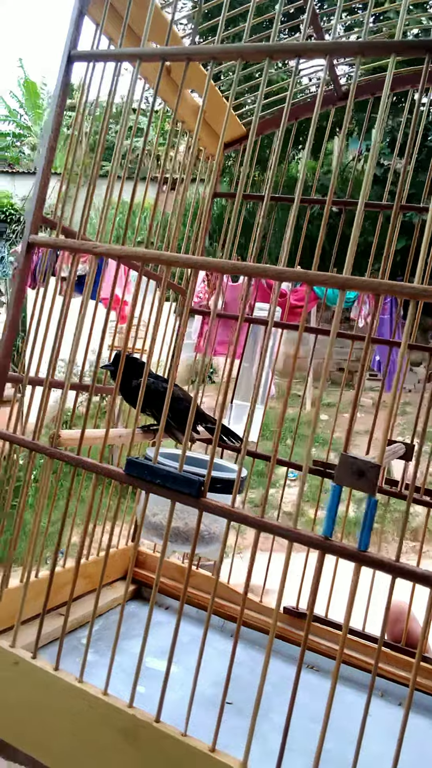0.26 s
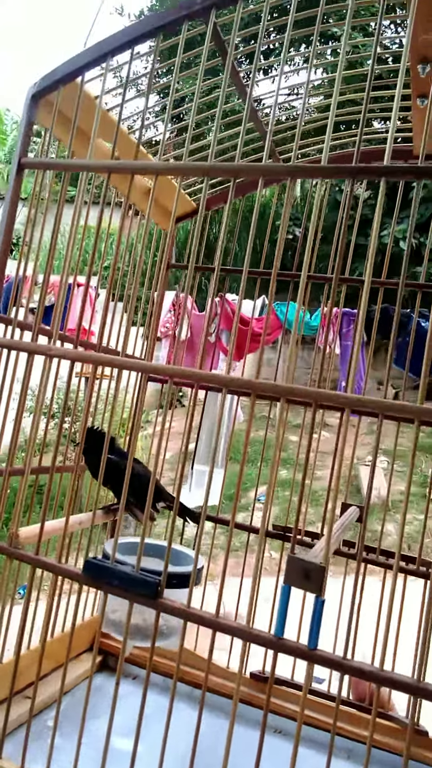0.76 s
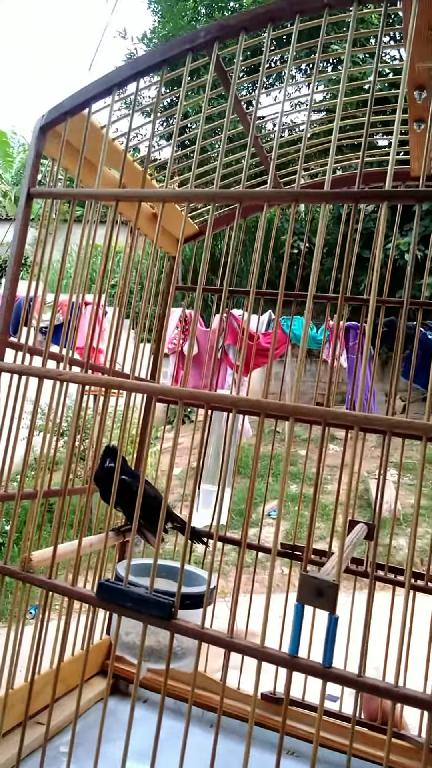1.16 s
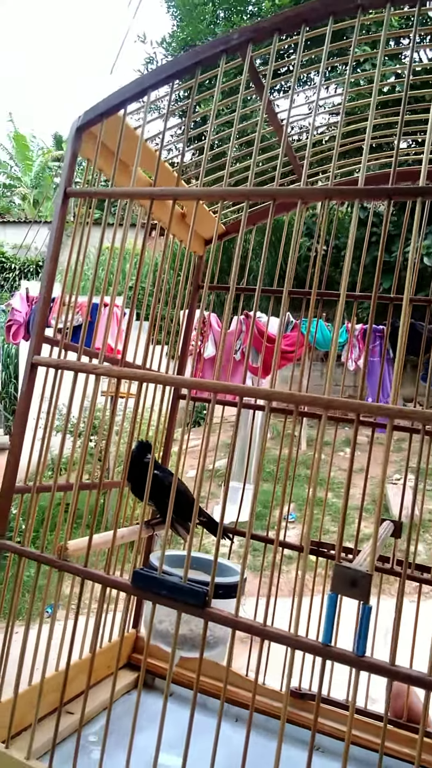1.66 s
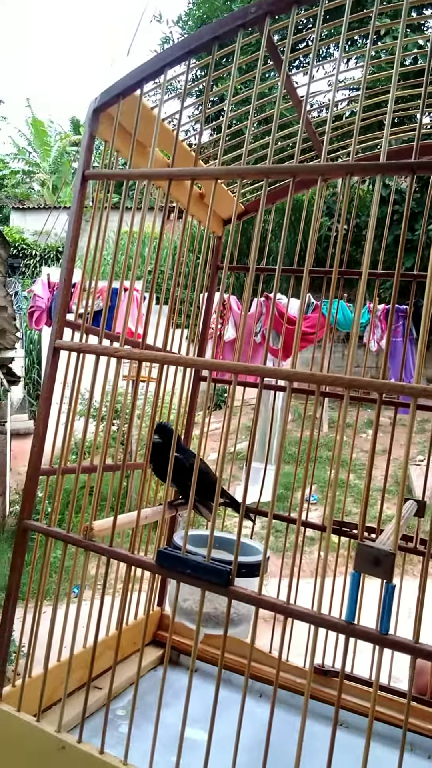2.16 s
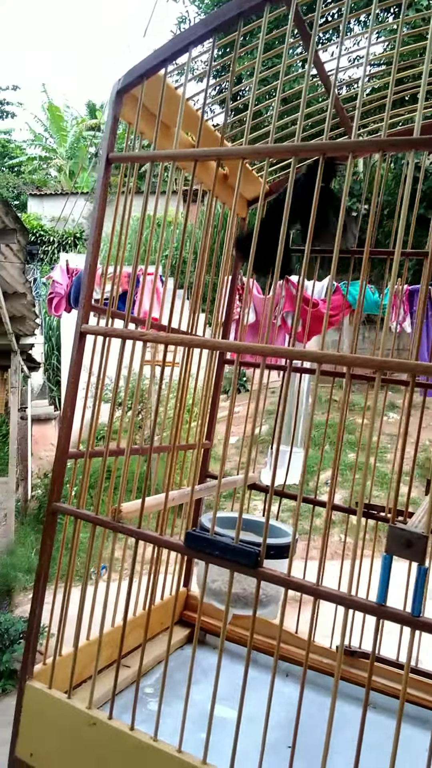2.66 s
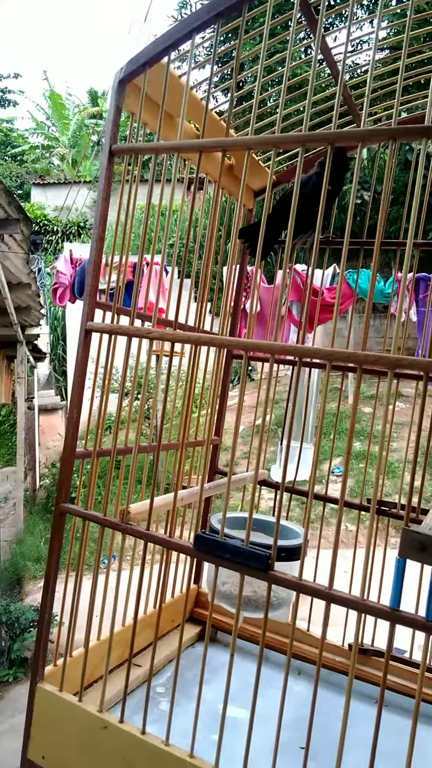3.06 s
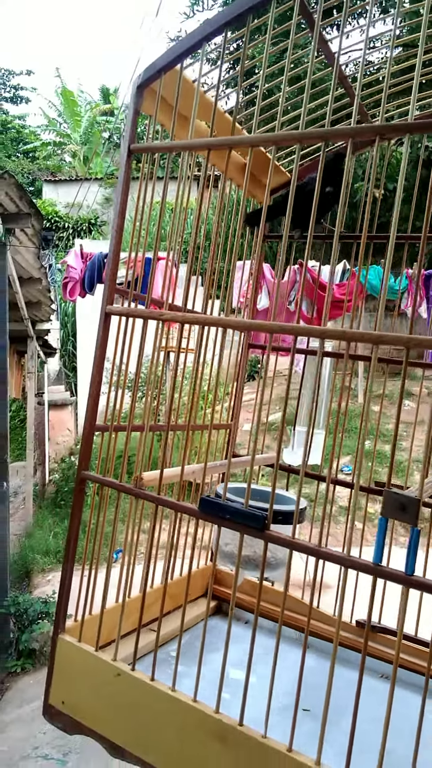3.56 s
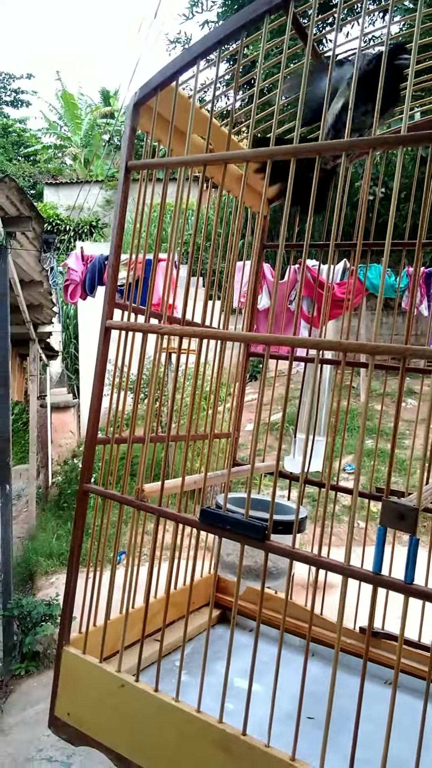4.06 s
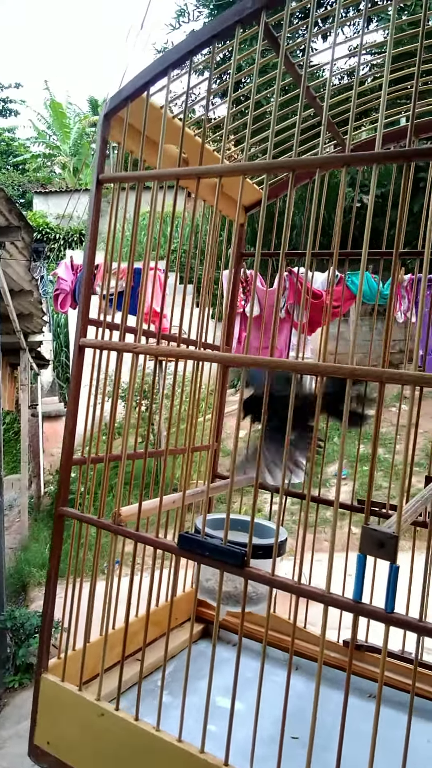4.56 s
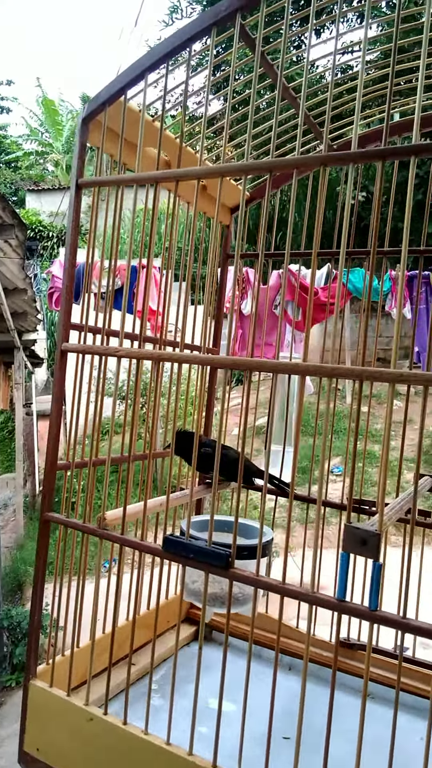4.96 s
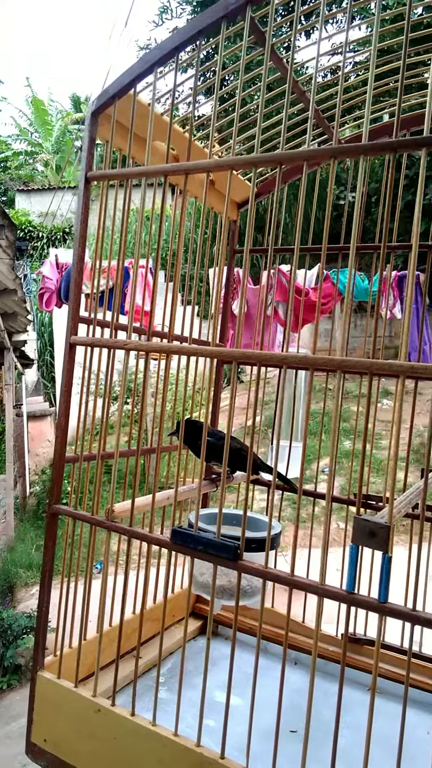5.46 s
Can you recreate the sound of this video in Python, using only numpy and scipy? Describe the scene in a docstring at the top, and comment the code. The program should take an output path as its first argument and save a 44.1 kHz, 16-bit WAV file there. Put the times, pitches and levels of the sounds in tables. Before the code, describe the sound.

A microphone clicks open with a dull pop in a walled yard. A far bird buzzes, a hollow double knock sounds, and another distant songbird runs down slurred whistles and chirps. A caged bird close by gives tiny sharp chips with soft thumps, rattles the cage lightly, then delivers a piercing stutter, buzz and short whistle. Low rumble and airy rush grow toward the end.

```python
"""Caged grassquit in a walled yard

A caged grassquit gives thin chips and one loud song: a stutter, a buzz and a short whistle. Its chips are
rapid sweeps, its buzz a train of short falling sweeps. Farther off another grassquit sings the same song, a
third songbird runs down slurred whistles built from gliding tones, and something knocks, a burst in resonances.
The phone's microphone switches on with a pop, has a narrow band and turns the shrillest notes into dull thumps."""
import sys
import numpy as np
from scipy import signal
from scipy.fft import rfft, irfft
from scipy.io import wavfile
from scipy.ndimage import uniform_filter1d, map_coordinates

SR = 44100
rng = np.random.default_rng(int(sys.argv[2]) if len(sys.argv) > 2 else 0)


def wrap_up_sound(samples):
    """Save the sound to the file named by the first command line argument, as 16-bit audio."""
    columns = np.atleast_2d(samples).T
    # keep every value between -1 and 1, then stretch to whole-number steps
    tamed = np.clip(columns, -1, 1)
    steps = np.round(tamed * 32767).astype(np.int16)
    wavfile.write(sys.argv[1], SR, steps)


N = 252252
TIME = np.arange(N) / SR


def from_db(db):
    """Logarithmic level: decibels become an amplitude ratio."""
    return 10 ** (np.asarray(db) / 20)


def rms_one(x):
    """Normalisation: scale to unit root-mean-square."""
    return x / np.sqrt(np.mean(x ** 2) + 1e-20)


def add(out, start_s, sound):
    """Superposition: mix a sound in at a time."""
    at = max(round(start_s * SR), 0)
    out[at:at + len(sound)] += sound[:N - at]


def cut(x, hz, kind, order=2):
    """Butterworth filtering: a maximally flat passband."""
    sections = signal.butter(order, min(hz, SR * .45), kind, fs=SR, output="sos")
    return signal.sosfilt(sections, x + 1e-18)


def drift(rate_hz):
    """Low-passed noise: a smooth random course of unit rms."""
    noise = rng.standard_normal(N + SR)
    return rms_one(cut(noise, rate_hz, "low", order=4)[SR:])   # the filter's onset is dropped


def coloured(spectrum):
    """Spectral shaping: noise of unit rms, its density drawn on a logarithmic frequency axis."""
    hz, db = np.transpose(spectrum)
    log_bins = np.log(np.fft.rfftfreq(N, 1 / SR) + 1)
    gain = from_db(np.interp(log_bins, np.log(hz), db, left=-90, right=-90))
    return rms_one(irfft(rfft(rng.standard_normal(N)) * gain, N))


def resonance(x, hz, width_hz):
    """Two-pole resonance: a damped mode with a gain close to 1 at its peak."""
    radius = np.exp(-np.pi * width_hz / SR)
    zeros = np.array([1, 0, -1]) * (1 - radius ** 2) / 2
    poles = [1, -2 * radius * np.cos(2 * np.pi * hz / SR), radius ** 2]
    return signal.lfilter(zeros, poles, x)


def phase_of(hz):
    """Frequency modulation: phase is the running integral of frequency."""
    return 2 * np.pi * np.cumsum(hz) / SR


def envelope(t, attack_s, release_s):
    """Amplitude envelope: a squared-sine rise, a hold and a squared-sine fall."""
    edge = np.minimum((t - t[0]) / attack_s, (t[-1] - t) / release_s)
    return np.sin(np.pi / 2 * np.clip(edge, 0, 1)) ** 2


def echo(x, delay_s, db):
    """Specular reflection: one delayed copy, whose delay may move."""
    return from_db(db) * map_coordinates(x, [(TIME - delay_s) * SR], order=3)


def yard(x, t60, build_s, early_db):
    """Diffuse reverberation: walls and leaves scatter a cluster of early returns, then a dying wash."""
    t = TIME[:SR]
    decay = from_db(-60 * t / t60) + from_db(early_db) * np.exp(-t / 0.048)
    response = rng.standard_normal(SR) * (1 - np.exp(-t / build_s)) * decay
    return signal.fftconvolve(x, response / np.linalg.norm(response))[:N]


# Yard air over time. Each row: time in seconds, relative rumble level in dB, relative hiss level in dB.
AIR_COURSE = [(0.18, -63, -68.7), (0.42, -61, -66), (0.48, -52.5, -64), (0.84, -67, -75),
              (1.14, -57.5, -63), (1.26, -63.5, -70.5), (1.5, -59, -64), (1.56, -61.5, -70),
              (1.86, -55, -61.5), (1.92, -58, -65.4), (2.88, -53, -61), (3.12, -61.3, -68.5),
              (3.24, -55.5, -63.0), (3.9, -51.5, -61.5), (3.96, -47.5, -57), (4.26, -42.5, -51),
              (4.38, -46, -55), (4.92, -44, -53), (4.98, -43, -53.5), (5.1, -44.5, -56), (5.22, -40, -49.5),
              (5.7, -41, -51)]
# Spectrum of the low rumble. Each row: frequency in Hz, relative density in dB per Hz.
RUMBLE_SPECTRUM = [(15, -46.5), (25, -30.5), (48, -1), (81, 0.5), (151, -5), (306, -11.5), (400, -19.5),
                   (520, -32.5), (880, -120)]
# Spectrum of the soft rushing. Each row: frequency in Hz, relative density in dB per Hz.
HISS_SPECTRUM = [(150, -27), (250, -4.5), (432, -3.5), (606, -5.5), (734, -7.5), (1340, -13), (2690, -20.5),
                 (6140, -34.5), (7550, -36), (8500, -66.5), (11000, -90), (18700, -120)]


def air(flutter_db=2.3, crackle_db=2.5, calm_share=0.25, lump_db=1.0):
    """Amplitude-modulated noise: rumble and a rushing that flutters and crackles more as it grows."""
    time_s, rumble_course, hiss_course = np.transpose(AIR_COURSE)
    rumble_db = np.interp(TIME, time_s, rumble_course) + 2
    hiss_db = np.interp(TIME, time_s, hiss_course) + 3.5
    unrest = np.interp(hiss_db, [-61, -53], [calm_share, 1])
    flutter = unrest * (flutter_db * drift(45) + crackle_db * drift(220))
    rumble = from_db(rumble_db + lump_db * drift(27) + .4 * flutter) * coloured(RUMBLE_SPECTRUM)
    return rumble + from_db(hiss_db + flutter) * coloured(HISS_SPECTRUM)


# A knock across the yard, struck twice. Each row: start in seconds, relative level in dB.
KNOCK_BLOWS = [(1.043, -44.5), (1.076, -42.5)]
# Modes of the knocked body. Each row: frequency in Hz, bandwidth in Hz, relative level in dB.
BODY_MODES = [(765, 41, 10.5), (882, 49, 9.5), (960, 17, -11.5), (1650, 310, -18), (2200, 170, -9),
              (2520, 100, -19), (3120, 400, -40)]


def knock(t60=0.14, tail_db=-7, tail_t60=0.5, crack_db=-22):
    """Modal resonance: decaying noise excites a hollow body, with a dying return from the walls."""
    blow, t = np.zeros(N), TIME[:SR]
    decay = from_db(-60 * t / t60) + from_db(tail_db - 60 * t / tail_t60)
    for start_s, db in KNOCK_BLOWS:
        add(blow, start_s, from_db(db) * decay * rng.standard_normal(SR))
    body = sum(from_db(db) * resonance(blow, hz, width_hz) for hz, width_hz, db in BODY_MODES)
    return from_db(11.5) * (body + from_db(crack_db) * cut(blow, 4000, "low"))


# Claws and wing tips touch the cage. Each row: start in seconds, relative level in dB.
CAGE_TAPS = [(2.616, -45), (4.003, -58), (4.037, -50), (4.464, -46), (4.498, -38.5), (4.537, -46.5),
             (4.589, -34), (5.101, -54.5), (5.637, -53.5), (5.674, -63)]


def taps(decay_s=0.0027):
    """Impulsive contact: short, dry, exponentially dying noise with its lows strengthened."""
    out, t = np.zeros(N), TIME[:SR // 20]
    for start_s, db in CAGE_TAPS:
        add(out, start_s, from_db(db) * np.exp(-t / decay_s) * rng.standard_normal(len(t)))
    return out + 3 * cut(out, 960, "low")


def arcs(rows, bow_per_s, attack_s, release_s, fade_db):
    """Gliding pitch: notes fade or grow, and bow more the longer they are; yields times, Hz and gain."""
    for start_s, length_s, first_hz, last_hz, db in rows:
        u = np.linspace(0, 1, round(length_s * SR))
        t = start_s + u * length_s
        bow = bow_per_s * length_s * np.sin(np.pi * u)
        hz = (first_hz + (last_hz - first_hz) * u) * (1 + bow)
        # a negative fade_db makes the note grow
        yield t, hz, from_db(db - fade_db * u) * envelope(t, attack_s, release_s)


def whistles(notes, waver, waver_hz, shimmer_db, partials=((1, 0),)):
    """Random modulation: pitch and level tremble; a wide, fast tremble is a rasp."""
    out = np.zeros(N)
    tremble, shimmer = 1 + waver * drift(waver_hz), shimmer_db * drift(160)
    for t, hz, gain in notes:
        phase = phase_of(hz * np.interp(t, TIME, tremble))
        tone = sum(from_db(level) * np.sin(round(k) * phase) for k, level in partials)
        level = gain * from_db(np.interp(t, TIME, shimmer))
        add(out, t[0], np.sqrt(2) * level * tone)
    return out


# Far songbird's short whistles and flicks. Each row: start in seconds, length in seconds, first pitch in Hz,
# last pitch in Hz, relative level in dB.
SHORT_WHISTLES = [(1.05, 0.074, 4520, 4657, -49.5), (1.375, 0.1, 5290, 4285, -48),
                  (1.592, 0.013, 6330, 8450, -50), (1.664, 0.045, 3730, 3840, -53.5),
                  (1.725, .055, 4710, 4790, -48.5), (1.888, 0.019, 6260, 8370, -51),
                  (2.005, 0.073, 5120, 5080, -45.5), (2.153, .016, 5600, 6700, -53),
                  (2.185, .02, 7600, 6800, -56.5), (2.2, 0.056, 4680, 4860, -48),
                  (2.403, 0.028, 4230, 4090, -44.5), (2.548, 0.068, 3703, 4100, -43.5),
                  (2.735, 0.044, 3533, 4024, -45.5)]
# Faint low whistles from farther away. Each row: start in seconds, length in seconds, first pitch in Hz,
# last pitch in Hz, relative level in dB.
FAINT_WHISTLES = [(2.16, .18, 1823, 1927, -70.5), (2.54, 0.28, 1930, 2003, -70),
                  (3.33, 0.23, 1960, 1922, -69), (3.55, 0.063, 2050, 2220, -67)]


def clear_whistles():
    """Nearly pure tones: a narrow random tremble leaves the whistles clear."""
    notes = [*arcs(SHORT_WHISTLES, bow_per_s=.25, attack_s=0.0039, release_s=0.0047, fade_db=5),
             *arcs(FAINT_WHISTLES, bow_per_s=0, attack_s=0.03, release_s=.04, fade_db=-1)]
    return whistles(notes, waver=0.012, waver_hz=190, shimmer_db=3.5)


# Far songbird's raspy chirps. Each row: start in seconds, length in seconds, first pitch in Hz,
# last pitch in Hz, relative level in dB.
RASPY_CHIRPS = [(1.69, .075, 2530, 2985, -63), (2.11, 0.06, 3950, 4390, -48.5),
                (2.295, 0.078, 3900, 3960, -49.5), (2.485, 0.061, 3600, 3670, -54),
                (2.67, 0.059, 3400, 3155, -53.5)]


def raspy_chirps():
    """Noise frequency modulation: a wide, fast tremble spreads each tone into a rasp."""
    notes = arcs(RASPY_CHIRPS, bow_per_s=-0.8, attack_s=.006, release_s=0.0042, fade_db=-0.5)
    return whistles(notes, waver=0.07, waver_hz=323, shimmer_db=-0.5)


# Far songbird's nasal calls. Each row: start in seconds, length in seconds, first pitch in Hz,
# last pitch in Hz, relative level in dB.
NASAL_NOTES = [(.945, .105, 2118, 2306, -56.5), (1.05, 0.036, 2392, 2404, -58),
               (1.662, 0.036, 1890, 1980, -55)]
# Their harmonics. Each row: multiple of the pitch, relative level in dB.
NASAL_HARMONICS = [(1, -13.5), (2, -9.5), (3, -4.5), (4, -14)]


def nasal_calls():
    """Harmonic series: second and third partials stronger than the fundamental give a nasal colour."""
    notes = arcs(NASAL_NOTES, bow_per_s=-1.4, attack_s=0.0046, release_s=0.0051, fade_db=-9)
    return whistles(notes, waver=0.036, waver_hz=330, shimmer_db=3, partials=NASAL_HARMONICS)


# Far songbird's falling slurs. Each row: start in seconds, length in seconds, top pitch in Hz,
# bottom pitch in Hz, time to fall half-way in seconds, relative level in dB.
FALLING_SLURS = [(1.292, .09, 7560, 4940, .052, -55.5), (1.581, 0.11, 7000, 4100, .05, -49.5),
                 (1.894, .115, 7770, 4550, .063, -44.5), (2.156, .055, 6420, 4530, .024, -44.5),
                 (2.358, .042, 5200, 4120, 0.0079, -46)]


def slurs(steepness=3.0, attack_share=0.82, release_s=0.0053):
    """Sigmoid glide: notes swell at a high pitch, fall fast and level out; yields times, Hz and gain."""
    for start_s, length_s, top_hz, bottom_hz, half_way_s, db in FALLING_SLURS:
        t = np.arange(0, length_s, 1 / SR)
        hz = bottom_hz + (top_hz - bottom_hz) / (1 + (t / half_way_s) ** steepness)
        yield start_s + t, hz, from_db(db) * envelope(t, attack_share * half_way_s, release_s)


def far_songbird():
    """Direct and reverberant field: the songbird is heard with one echo and the yard's wash."""
    song = clear_whistles() + whistles(slurs(), waver=0.022, waver_hz=260, shimmer_db=3.5)
    song = song + raspy_chirps() + nasal_calls()
    wash = from_db(-5) * yard(song, t60=0.66, build_s=0.0054, early_db=14.5)
    return from_db(-2.5) * song + echo(song, .019, -10.0) + wash


# Pitch of a buzz as it begins and the depth it sinks by; its pulse rate before it closes
BUZZ_HZ, BUZZ_SAG_HZ, PULSES_PER_S = 7628, 638, 204
# Over this time at its close it drops further and quickens
CLOSE_S, CLOSE_DROP_HZ, CLOSE_QUICKENS_PER_S = 0.031, 430, 46
ENDING_S, ENDING_HZ = 0.076, 5374   # the whistle that closes a grassquit song


def buzz_course(length_s, swell_db, swell_s, edge_s=0.0025, close_db=-10):
    """Slow modulation: a buzz swells and sinks, then drops, quickens and weakens as it closes."""
    t = np.arange(0, length_s, 1 / SR)
    closing = np.clip(1 - (length_s - t) / CLOSE_S, 0, 1)
    centre_hz = BUZZ_HZ - BUZZ_SAG_HZ * np.sin(np.pi / 2 * t / length_s) - CLOSE_DROP_HZ * closing
    level_db = close_db * closing - swell_db * np.exp(-t / swell_s)
    gain = envelope(t, edge_s, edge_s) * from_db(level_db)
    return PULSES_PER_S + CLOSE_QUICKENS_PER_S * closing, centre_hz, gain


def buzz(per_s, centre_hz, sweep_hz, sharpness, uneven_db):
    """Pulse train: the syrinx opens about 200 times a second; each pulse is a tiny falling sweep."""
    cycles = np.cumsum(per_s) / SR
    chance = rng.standard_normal((200, 2))[cycles.astype(int)]   # one pair per pulse: pitch, level
    within = cycles % 1
    hz = centre_hz + sweep_hz * (.5 - within) + 70 * chance[:, 0]
    pulse = np.sin(np.pi * within) ** sharpness * from_db(uneven_db * chance[:, 1])
    return rms_one(pulse * np.sin(phase_of(hz)))


# Songs of the far grassquit. Each row: start in seconds, length of the buzz in seconds,
# relative buzz level in dB, relative closing whistle level in dB.
DISTANT_SONGS = [(.12, .372, -59, -53.5), (3.145, .271, -56.5, -48)]


def far_grassquit():
    """Reverberant field: a slowly swelling buzz, then at once a whistle, mostly by way of the walls."""
    song = np.zeros(N)
    for start_s, length_s, db, _ in DISTANT_SONGS:
        per_s, centre_hz, gain = buzz_course(length_s, swell_db=14.5, swell_s=0.065)
        pulses = buzz(per_s, centre_hz, sweep_hz=2200, sharpness=0.69, uneven_db=4.5)
        add(song, start_s, from_db(db) * gain * pulses)
    endings = [(start_s + length_s, ENDING_S, ENDING_HZ, ENDING_HZ, db)
               for start_s, length_s, _, db in DISTANT_SONGS]
    notes = arcs(endings, bow_per_s=0, attack_s=.002, release_s=0.012, fade_db=18.5)
    song = song + whistles(notes, waver=0.0054, waver_hz=200, shimmer_db=5.5)
    return from_db(-6.5) * song + from_db(0.5) * yard(song, t60=1.0, build_s=0.0025, early_db=19)


# Closing whistles of the caged bird. Each row: start in seconds, relative level in dB.
CLOSING_WHISTLES = [(.105, -33.5), (4.89, -25)]


def near_whistles(steady_s=.02, flutter_hz=190, flutters_per_s=230, shimmer_db=1.5, fade_db=7):
    """Growing frequency modulation: the whistle starts pure, then flutters upward as it fades."""
    out, t = np.zeros(N), np.arange(0, ENDING_S, 1 / SR)
    unrest = np.clip(t / steady_s, 0, 1) ** 2
    flutter, shimmer = np.abs(drift(flutters_per_s)), drift(200)
    for start_s, db in CLOSING_WHISTLES:
        hz = ENDING_HZ + flutter_hz * unrest * np.interp(start_s + t, TIME, flutter)
        shimmer_now = shimmer_db * unrest * np.interp(start_s + t, TIME, shimmer)
        gain = from_db(db - fade_db * t / ENDING_S + shimmer_now) * envelope(t, 0.0055, 0.017)
        add(out, start_s, np.sqrt(2) * gain * np.sin(phase_of(hz)))
    return out


# The loud buzz of the caged bird. The one row: start in seconds, length in seconds, relative level in dB.
LOUD_BUZZ = (4.66, 0.23, -21.5)


def near_buzz():
    """Pulse train: sharper pulses stand apart in the loud middle of the caged bird's song."""
    out = np.zeros(N)
    start_s, length_s, db = LOUD_BUZZ
    per_s, centre_hz, gain = buzz_course(length_s, swell_db=1.5, swell_s=0.045)
    pulses = buzz(per_s, centre_hz, sweep_hz=2320, sharpness=2.2, uneven_db=1.34)
    add(out, start_s, from_db(db) * gain * pulses)
    return out


VOICE_RATE_HZ = 16000   # the sampling rate; the highest notes fold back about half of it
# The caged bird's rising chips. Each row: start in seconds, length in seconds, relative level in dB,
# relative thump level in dB.
RISING_CHIPS = [(2.333, 0.011, -34, -38), (2.8, 0.017, -56, -33), (3.278, .014, -32, -33.5),
                (3.449, 0.011, -41.5, -28), (3.7, .013, -35.5, -31.5), (3.925, 0.014, -47, -23),
                (4.086, 0.0095, -45, -57)]
# Upward flicks that open its song. Each row: start in seconds, relative level in dB, relative thump level in dB.
STUTTER_UP = [(4.6, -19.5, -19.5), (4.6032, -17, -18)]
# Downward flicks that follow. Each row: start in seconds, relative level in dB, relative thump level in dB.
STUTTER_DOWN = [(4.615, -15, -12.5), (4.6306, -11, -10.5), (4.6451, -17, -13), (4.656, -23, -14)]


def sweeps(flick_s=0.0039, fold_db=-13, shrill_power=12.8, linger=1.54):
    """Chirps and aliasing: fast sweeps linger low; the microphone makes pressure steps of their shrill end."""
    sound, thumps = np.zeros(N), np.zeros(N)
    # start s, length s, first Hz, last Hz, level dB, thump dB
    calls = [(start_s, length_s, 6800, 12220, db, thump_db) for start_s, length_s, db, thump_db in RISING_CHIPS]
    calls += [(start_s, flick_s, 5970, 9540, db, thump_db) for start_s, db, thump_db in STUTTER_UP]
    calls += [(start_s, flick_s, 9230, 6510, db, thump_db) for start_s, db, thump_db in STUTTER_DOWN]
    for start_s, length_s, first_hz, last_hz, db, thump_db in calls:
        u = np.linspace(0, 1, round(length_s * SR))
        height = u if last_hz > first_hz else 1 - u
        hz = min(first_hz, last_hz) + abs(last_hz - first_hz) * height ** linger
        swell = np.sin(np.pi * u) ** 2
        # the very top of a sweep folds back into the band
        fold_gain = from_db(fold_db) * np.clip((hz - 10500) / 1000, 0, 1) * np.sin(np.pi * u)
        folded = fold_gain * np.sin(phase_of(VOICE_RATE_HZ - hz))
        add(sound, start_s, from_db(db) * (swell * np.sin(phase_of(hz)) + folded))
        shrill = swell * (hz / first_hz) ** shrill_power
        add(thumps, start_s, from_db(thump_db) * shrill / shrill.max())
    return sound, thumps


def bass_ring(x, hz=66, q=2.9):
    """Resonant high-pass: the microphone's bass cut rings briefly after each step."""
    omega = 2 * np.pi * hz
    return signal.lfilter(*signal.bilinear([1, 0, 0], [1, omega / q, omega ** 2], SR), x + 1e-18)


# Grit of the overdriven microphone. Each row: frequency in Hz, relative density in dB per Hz.
GRIT_SPECTRUM = [(180, -45), (300, -14), (400, 1), (479, -15), (610, -9), (739, -8.5), (2300, -16.5),
                 (3400, -28.5), (5300, -25), (6890, -59), (11700, -120)]


def overdrive(song, thumps, hum_db=7, hash_db=9, steepness=1.183, rasp_db=6):
    """Envelope detection: loud shrill sound leaves thumps, a hum at the pulse rate and a gritty hash."""
    power = np.abs(cut(song ** 2, 1400, "low"))
    mean_power = np.abs(uniform_filter1d(power, SR // 50))   # over 20 ms
    grit = from_db(hash_db) * ((power + mean_power) / 2) ** steepness * coloured(GRIT_SPECTRUM)
    crests = np.maximum(power - 0.92 * mean_power, 0)   # only the tops of the pulses overload
    rasp = from_db(rasp_db) * cut(crests, 380, "high")
    return grit - rasp - bass_ring(thumps + from_db(hum_db) * power)


def scene():
    """Superposition of near and far fields: the caged bird is close and dry, the others distant."""
    chips_and_stutter, thumps = sweeps()
    song = near_buzz()
    near = chips_and_stutter + song + near_whistles()
    # cage tray and wall; the bird moves
    near = near + echo(near, .0016 + .00006 * drift(27), -4.5) + echo(near, 0.0066, -22.0)
    near = near + from_db(-14.5) * yard(near, t60=0.37, build_s=0.0032, early_db=6.5)
    background = air() + knock() + taps() + far_songbird() + far_grassquit()
    return (background + near + overdrive(song, thumps))[None]


def record(dry, pop_s=.0555, pop_db=-24.5, mic_on_s=.119, mic_on_db=-32):
    """Switching transient and band limit: the microphone pops twice as it opens; its band ends steeply."""
    pops, t = np.zeros(N), TIME[:SR // 10]
    rebound = 1.67 * (t > .0011) * np.exp(-t / 0.0029)
    add(pops, pop_s, from_db(pop_db) * (np.exp(-t / 0.0053) - rebound))
    add(pops, mic_on_s, -from_db(mic_on_db) * np.exp(-t / .008))
    heard = cut(dry * (TIME > mic_on_s) + bass_ring(pops), 7490, "low", order=12)
    return signal.sosfilt(signal.ellip(10, .2, 70, 8450, fs=SR, output="sos"), heard)


dry = scene()
out = record(dry)
wrap_up_sound(out)
```